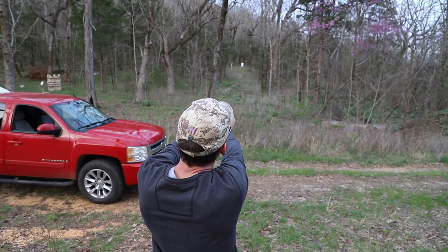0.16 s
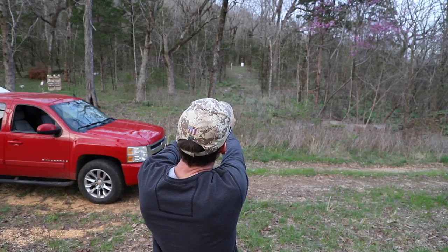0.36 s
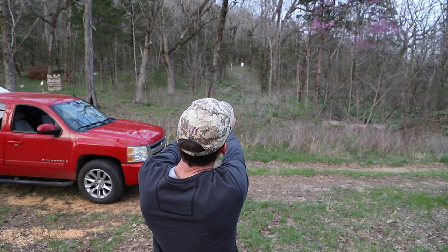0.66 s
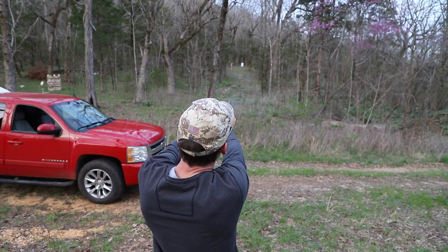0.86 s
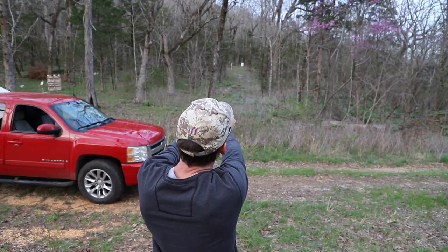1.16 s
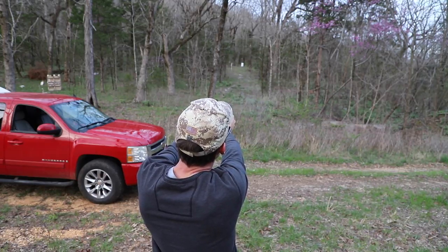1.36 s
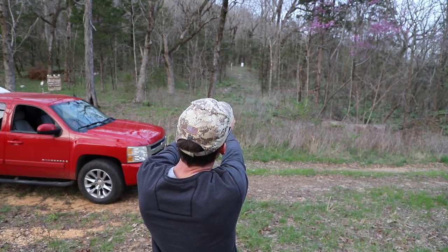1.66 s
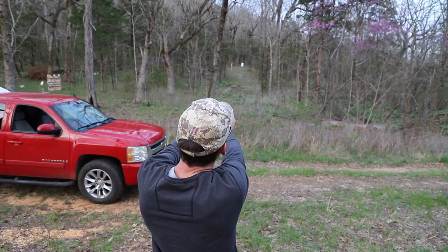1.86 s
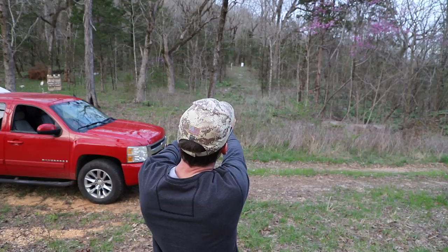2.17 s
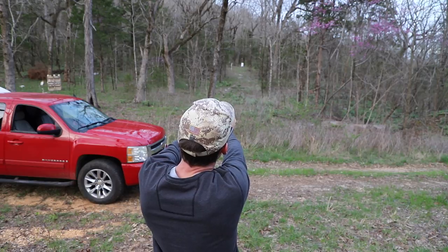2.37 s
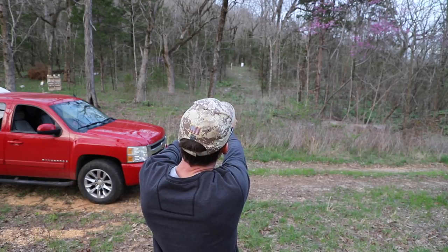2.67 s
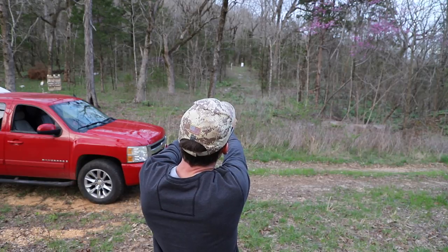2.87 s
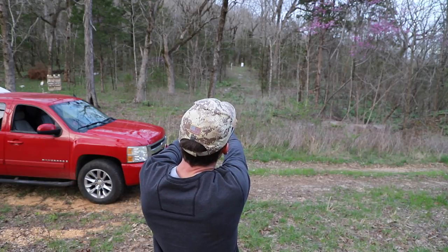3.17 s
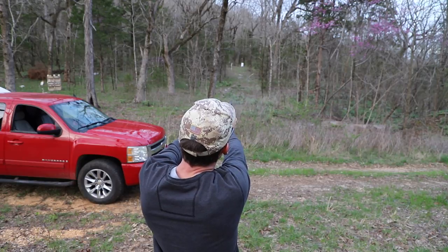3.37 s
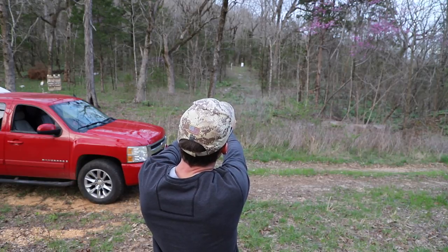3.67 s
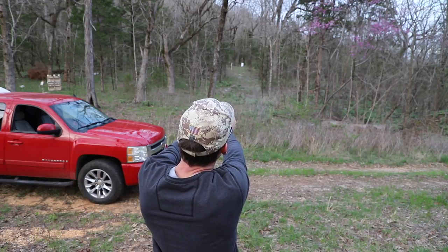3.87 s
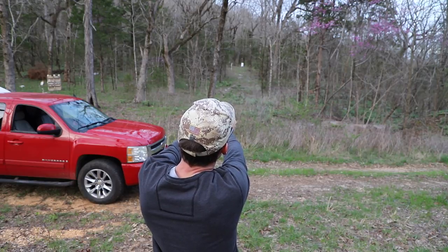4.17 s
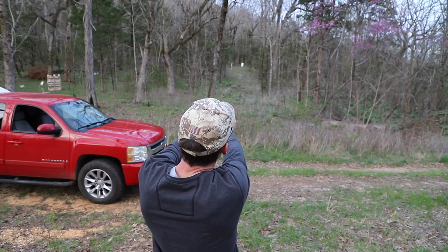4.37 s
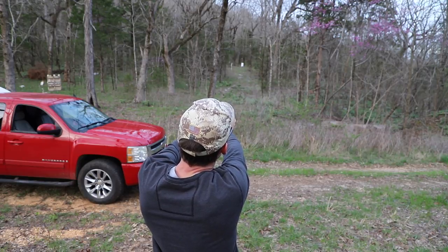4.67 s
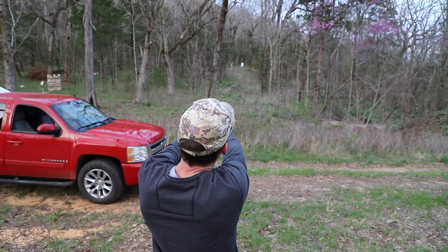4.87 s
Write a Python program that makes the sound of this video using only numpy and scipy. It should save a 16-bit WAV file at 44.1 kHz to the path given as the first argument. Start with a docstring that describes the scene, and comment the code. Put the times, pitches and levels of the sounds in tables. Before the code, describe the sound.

At a wood's edge, a silenced pistol fires twice, clipped and sharp; trees echo, a far target smacks, spent cases knock on metal.

```python
"""Edge of a wood: two suppressed pistol shots, shaped noise plus ringing modes, driven into hard clipping.
The slide cycles; trees return a swelling echo, banded noise whose treble dies first.
The bullet smacks a far target; the case hits a truck and the ground, modes and grainy noise bursts.
An earlier impact's echo fades at the start and a rough hum swells until the first shot.
Near-sine birds call far off over distant rumble and hiss, banded noise."""
import sys
import numpy as np
from scipy import signal
from scipy.io import wavfile

SR = 44100
rng = np.random.default_rng(int(sys.argv[2]) if len(sys.argv) > 2 else 0)


def master(y):
    """Save y as 16-bit WAV."""
    cut = np.clip(np.atleast_2d(y).T, -1, 1)
    pcm = np.round(cut * 32767)  # scale
    wavfile.write(sys.argv[1], SR, pcm.astype(np.int16))


N = 221690

# shots: start_s, blast_db (before clipping), slam_delay_s (blast to slide slam)
SHOTS = [(0.9327, 9.5, .0241), (3.3307, 9.5, .0229)]
# gas colour: freq_hz, relative_db_per_hz
GAS_SPECTRUM = [(59, -31.5), (150, -15.5), (500, -13.5), (902, -8), (1470, -12), (2830, -1), (5330, -8),
                (6590, 3), (7320, -11.5), (14100, -24.5), (15700, -30.5)]
# can's air column: freq_hz, level_db, t60_s
BORE_MODES = [(856, 10.5, 0.018), (1080, 5, 0.016)]
# low push as gas leaves the can: lag_s (after blast), freq_hz, level_db, t60_s
PUSH = [(.0021, 305, -5, .05), (.0052, 125, -9, .1)]
# action parts: lag_s (after blast), level_db
ACTION_HITS = [(-.0028, -23), (-.0016, -11.5)]
# slide slam: lag_s (after slam), level_db
SLAM_HITS = [(0, -13.5), (.0006, -12.5), (.009, -20.5)]
# steel of the action: freq_hz, level_db, t60_s
STEEL_MODES = [(1200, -6, 0.0049), (2500, -3, .002), (3400, -6, 0.0014), (6150, -2, .002),
               (8000, -6.5, 0.0016), (12000, -16.5, .0015)]
BLAST_HOLD_S, BLAST_T60_S = 0.0041, 0.015
VENT_DB, VENT_T60_S = -23.5, 0.15
BORE_LAG_S = 0.0008
PUSH_END_S, PUSH_END_T60_S = 0.0112, 0.012


def blast():
    """Turbulent gas gushes, then vents; the air column booms, a low push is cut off, steel clacks."""
    gas = sum(part for _, part in bands(rng.standard_normal((2, N)), GAS_SPECTRUM))
    gas_gain, push = np.zeros(N), np.zeros(N)
    hits = []
    for start_s, blast_db, slam_delay_s in SHOTS:
        age_s = since(start_s)
        gush = (age_s >= 0) * dying(np.maximum(age_s - BLAST_HOLD_S, 0), BLAST_T60_S)
        gas_gain += from_db(blast_db) * gush + from_db(VENT_DB) * dying(age_s, VENT_T60_S)

        # the can has emptied
        cutoff = dying(np.maximum(age_s - PUSH_END_S, 0), PUSH_END_T60_S)
        for lag_s, *mode in PUSH:
            push += strike([(start_s + lag_s, 0)], [mode]) * cutoff

        hits += [(start_s + lag_s, level_db) for lag_s, level_db in ACTION_HITS]
        hits += [(start_s + slam_delay_s + lag_s, level_db) for lag_s, level_db in SLAM_HITS]
    boom = strike([(start_s + BORE_LAG_S, 0) for start_s, *_ in SHOTS], BORE_MODES)
    clacks = strike(hits, STEEL_MODES, soft=True)
    return gas * gas_gain + boom + push + clacks


# scatter colour: freq_hz, relative_db_per_hz
WOOD_SPECTRUM = [(35, -52), (60, -13), (118, -5.5), (387, -8), (937, -15), (1330, -7), (3370, -4),
                 (4890, -9.5), (6040, -2), (15700, -21)]
# scatter decay: freq_hz, t60_s
WOOD_DECAY = [(100, 2.3), (500, 2.3), (2000, 1.85), (5000, 0.98), (9000, 0.68), (15000, 0.71)]
# silencer can resonances: freq_hz, width_hz, level_db
CAN_PEAKS = [(576, 310, -5.5), (1274, 110, -3.5), (1870.5, 47, -7.5), (2344, 56, -1), (3340, 300, -3.5),
             (4030, 110, 1.5), (4490, 220, -9), (5890, 220, 0), (6430, 280, -9.5), (7250, 130, -2),
             (8217, 140, -15), (9400, 110, -9)]
# trees' answer to each shot: level_db, tilt_db_per_octave (about 3 kHz)
ECHO_COLOUR = [(0.1, 0.33), (0.1, -0.1)]
CAN_DB = 9.5
TRUNKS_PER_S, TRUNK_DB = 65, -0.5


def wood_echo():
    """Scatter from many trees, treble dying first; single trunks stand out as slaps."""
    slaps = (rng.random(N) < TRUNKS_PER_S / SR) * rng.random(N)
    slaps = signal.lfilter([1], [1, -0.99], slaps) * from_db(TRUNK_DB)
    white = rng.standard_normal((2, N)) * (1 + slaps)
    coloured = white + from_db(CAN_DB) * resonate(white, CAN_PEAKS)
    shapes = [echo_shape(since(start_s)) for start_s, *_ in SHOTS]
    out = np.zeros(N)
    for hz, part in bands(coloured, WOOD_SPECTRUM):
        octaves = np.log2(hz / 3000)
        t60_s = at_hz(WOOD_DECAY, hz)
        for shape, (start_s, *_), (level_db, tilt_db) in zip(shapes, SHOTS, ECHO_COLOUR):
            gain = from_db(level_db + tilt_db * octaves)
            out += part * shape * gain * dying(since(start_s), t60_s)
    return out


# slaps from big trunks and banks: lag_s (after blast), level_db (added, re the scatter)
BIG_TRUNKS = [(0.088, 0), (.1, 1), (.133, -10), (0.141, 4.5), (.153, -6), (0.161, -1), (.178, -11),
              (0.197, 2), (0.211, -3), (0.243, 5.5)]
BIG_TRUNK_T60_S = 0.016
GROUND_DB, GROUND_START_S, GROUND_HOLD_S, GROUND_T60_S = -25.5, 0.015, 0.03, 0.054
CLEARING_DB = -33.5
TREES_S, TREES_DB = 0.084, -28.5
SWELL_S, SWELL_DB, DEPTH_DB_PER_DOUBLING = 0.066, 5.5, -2.5


def echo_shape(age_s):
    """Near ground answers first, then thin clearing scatter, then trees: swell, thinning with depth, slaps."""
    arrived = age_s >= GROUND_START_S
    ground = from_db(GROUND_DB) * arrived * dying(np.maximum(age_s - GROUND_HOLD_S, 0), GROUND_T60_S)
    inside_s = age_s - TREES_S
    clearing = from_db(CLEARING_DB) * arrived * (inside_s < 0)

    swell_db = SWELL_DB * np.clip(inside_s / SWELL_S, 0, 1)
    doublings = np.log2(np.maximum(age_s / (TREES_S + SWELL_S), 1))
    trees = (inside_s >= 0) * from_db(TREES_DB + swell_db + DEPTH_DB_PER_DOUBLING * doublings)
    slaps = sum(from_db(level_db) * dying(age_s - lag_s, BIG_TRUNK_T60_S) for lag_s, level_db in BIG_TRUNKS)
    trees = trees * (1 + slaps)
    return np.sqrt(ground ** 2 + clearing ** 2 + trees ** 2)


# bullet on target: start_s (negative: only its echo is heard), smack_db, bounce_db, echo_db,
# tilt_db_per_octave (echo, about 3 kHz)
IMPACTS = [(-.1, -67, -60, -47, 1.5), (1.514, -10, -17, -40.5, 4.5), (3.9137, -9.5, -25, -37.5, 0.6)]
# target: freq_hz, level_db, t60_s
TARGET_MODES = [(1830, -27, 0.013), (2560, -11, 0.0019), (3190, 2.5, 0.0022), (4330, -12, 0.0013),
                (5400, -17, .0013), (7250, -15, 0.0016), (9100, -27, 0.0048), (11600, -35, 0.0033)]
# far trees' colour: freq_hz, relative_db_per_hz
FAR_WOOD_SPECTRUM = [(240, -39), (400, -8), (444, -1), (547, -8.5), (770, -5.5), (1370, -0.5), (1820, -4.5),
                     (3510, -1.5), (4320, -11), (6860, -20), (14000, -42.5)]
# far trees' decay: freq_hz, t60_s
FAR_WOOD_DECAY = [(500, 1.6), (3000, 1.3), (6000, 1.1), (12000, 0.32)]
TARGET_BOUNCE_S, FAR_ECHO_LAG_S = 0.0017, 0.0015


def impacts():
    """The target's modes ring as a dry smack, again by ground bounce; far trees answer as decaying noise."""
    hits = []
    for start_s, smack_db, bounce_db, *_ in IMPACTS:
        hits += [(start_s, smack_db), (start_s + TARGET_BOUNCE_S, bounce_db)]
    out = strike(hits, TARGET_MODES, soft=True)
    for hz, part in bands(rng.standard_normal((2, N)), FAR_WOOD_SPECTRUM):
        octaves = np.log2(hz / 3000)
        t60_s = at_hz(FAR_WOOD_DECAY, hz)
        for start_s, _, _, echo_db, tilt_db in IMPACTS:
            gain = from_db(echo_db + tilt_db * octaves)
            out += part * gain * dying(since(start_s + FAR_ECHO_LAG_S), t60_s)
    return out


# case on sheet metal, rim then mouth: start_s (mouth), mouth_db, rebound_db, ring_db, skitter_db
LANDINGS = [(1.259, -13.5, -38, -48, -39), (4.2928, -15, -30, -46.5, -38.5)]
# truck panel: freq_hz, level_db, t60_s
PANEL_MODES = [(1220, -6.5, 0.005), (1760, -13, 0.0049), (3160, -5, 0.0045), (4230, -12, 0.0058),
               (5260, -11.5, 0.0019), (6940, -9.5, 0.0028), (8260, -15, 0.0031), (11700, -14, 0.0004)]
# brass case: freq_hz, level_db, t60_s
BRASS_MODES = [(7040, 0, 0.19), (7150, 1, .1), (7180, -1, .07)]
RIM_LEAD_S, RIM_DB, REBOUND_S = 0.0008, -4, 0.0068  # RIM_DB re mouth
SKITTER_LOW_HZ, SKITTER_HIGH_HZ, SKITTER_T60_S = 1300, 8000, 0.079


def case():
    """The spent case excites the truck's panel modes, rings faintly and skitters off as grainy noise."""
    knocks, rings, skitters = [], [], []
    for start_s, mouth_db, rebound_db, ring_db, skitter_db in LANDINGS:
        rebound_s = start_s + REBOUND_S
        knocks += [(start_s - RIM_LEAD_S, mouth_db + RIM_DB), (start_s, mouth_db), (rebound_s, rebound_db)]
        rings.append((start_s, ring_db))
        skitters.append((rebound_s, skitter_db, SKITTER_LOW_HZ, SKITTER_HIGH_HZ, SKITTER_T60_S))
    panel = strike(knocks, PANEL_MODES, soft=True)
    return panel + strike(rings, BRASS_MODES) + bursts(skitters)


# dry ticks on the ground: start_s, level_db, low_hz, high_hz
TICKS = [(.063, -31, 2420, 5100), (.107, -50, 2500, 6800), (0.18, -52, 2500, 6000),
         (0.21, -52.5, 2480, 6000), (1.388, -38.5, 2810, 4200), (1.436, -42, 3340, 4900),
         (1.745, -35.5, 1470, 4500), (1.835, -41, 1200, 4800), (1.857, -45, 700, 4000),
         (1.926, -44, 2400, 6600), (2.17, -54, 2500, 4500), (2.273, -47, 1200, 3600),
         (2.759, -47.5, 2900, 4150), (2.84, -58, 3230, 4070), (2.937, -56, 3100, 4400),
         (2.952, -58, 3000, 3900), (3.04, -55, 2200, 3400), (3.053, -50, 3000, 4200),
         (3.786, -44, 2900, 4000), (4.065, -31.5, 2200, 5500), (4.408, -41, 1200, 4900),
         (4.76, -53, 3500, 4600)]
# longer grainy noise bursts, the first a bright spray just after the bullet's smack:
# start_s, level_db, low_hz, high_hz, t60_s
LONG_BURSTS = [(1.517, -33, 2360, 5160, 0.2), (1.725, -48, 1190, 15000, 0.17),
               (1.733, -40, 1410, 4870, 0.098), (4.073, -30.5, 2350, 4140, 0.065),
               (4.137, -56, 6000, 15500, 0.26)]
TICK_T60_S = 0.017


def ticks():
    """Band-limited grainy noise: ticks share one short decay, the long bursts last longer."""
    return bursts([(*tick, TICK_T60_S) for tick in TICKS] + LONG_BURSTS)


# a dove three times, two thin whistles: start_s, length_s, first_hz, last_hz, level_db
BIRDS = [(2.52, .37, 513, 515, -58), (3.68, .33, 512, 507, -57), (4.55, .47, 505, 503, -59),
         (2.445, .05, 1460, 1485, -65), (4.77, .2, 1820, 2100, -74)]
CALL_ATTACK, CALL_RELEASE = 0.17, 0.17  # shares of the length
CALL_FADE_DB, CALL_EDGE_DB = -5.5, -10.5  # at release start; at both ends


def birds():
    """Soft near-sine calls, slightly unsteady: each rises, fades and stops while its pitch glides."""
    out = np.zeros(N)
    lowpass = signal.butter(2, 15, fs=SR, output="sos")
    waver_db = 2.0 * rms_one(signal.sosfilt(lowpass, rng.standard_normal(N)))
    corners = [0, CALL_ATTACK, 1 - CALL_RELEASE, 1]
    corner_db = [CALL_EDGE_DB, 0, CALL_FADE_DB, CALL_EDGE_DB]
    for start_s, length_s, first_hz, last_hz, level_db in BIRDS:
        progress = since(start_s) / length_s
        shape_db = np.interp(progress, corners, corner_db, left=-200, right=-200)
        hz = first_hz + (last_hz - first_hz) * np.sin(np.pi / 2 * np.clip(progress, 0, 1))
        tone = np.sqrt(2) * np.sin(2 * np.pi * np.cumsum(hz) / SR)
        out += from_db(level_db + shape_db + waver_db) * tone
    return out


# hum resonances: freq_hz, width_hz, level_db
HUM_PEAKS = [(535, 35, 4), (466, 84, -3), (770, 200, -10.5), (910, 140, -11.5)]
HUM_DB, HUM_BEFORE_DB = -55.5, -10  # HUM_BEFORE_DB re HUM_DB
HUM_START_S, HUM_RISE_S, HUM_END_S, HUM_T60_S = 0.52, 0.16, 0.93, 0.5


def hum():
    """Noise through low resonances: swells, holds until the first shot, then dies away."""
    rough = rms_one(resonate(rng.standard_normal(N), HUM_PEAKS))
    swell_db = HUM_BEFORE_DB * np.clip(1 - since(HUM_START_S) / HUM_RISE_S, 0, 1)
    fade = dying(np.maximum(since(HUM_END_S), 0), HUM_T60_S)
    return from_db(HUM_DB + swell_db) * fade * rough


# background colour: freq_hz, relative_db_per_hz
AIR_SPECTRUM = [(15, -38), (25, -5.5), (82, 4.5), (360, -2.5), (401, 2.5), (459, -3.5), (498, -5.5),
                (618, -9), (787, -5.5), (1060, -14), (1720, -20), (3370, -20), (4300, -23.5), (13700, -27),
                (15700, -23.5)]
AIR_DB = -56


def air():
    """Distant rumble and hiss: banded noise whose level drifts most in the bass."""
    out = np.zeros(N)
    for hz, part in bands(rng.standard_normal((2, N)), AIR_SPECTRUM):
        drift = np.interp(np.arange(N), np.linspace(0, N, 16), rng.standard_normal(16))
        out += part * from_db(drift * 2.0 / (1 + hz / 1500))
    return from_db(AIR_DB) * out


def strike(hits, modes, soft=False):
    """Clicks (start_s, level_db) ring modes (freq_hz, level_db, t60_s), levels varied; soft ones build up."""
    hits = np.array([hit for hit in hits if hit[0] >= 0])
    luck_db = 1.5 * rng.normal(0, 1, (len(hits), len(modes)))
    at = (hits[:, 0] * SR).astype(int)
    out = np.zeros(N)
    for k, (hz, level_db, t60_s) in enumerate(modes):
        x = np.full(N, 1e-18)
        x[at] = from_db(hits[:, 1] + level_db + luck_db[:, k])
        r, w = from_db(-60 / (t60_s * SR)), 2 * np.pi * hz / SR
        poles = [1, -2 * r * np.cos(w), r * r]
        x = signal.lfilter([0, np.sin(w)], poles, x)
        if soft:  # second pass rounds the attack, narrows the band
            x = signal.lfilter((-1) ** k * np.e * (1 - r) * np.array([1, 0, -1]), poles, x)
        out += x
    return out


def resonate(x, peaks):
    """Parallel resonances (freq_hz, width_hz, level_db), signs alternating."""
    out = 0
    for k, (hz, width_hz, level_db) in enumerate(peaks):
        r = np.exp(-np.pi * width_hz / SR)
        zeros = (1 - r * r) / 2 * np.array([1, 0, -1])
        poles = [1, -2 * r * np.cos(2 * np.pi * hz / SR), r * r]
        out = out + (-1) ** k * from_db(level_db) * signal.lfilter(zeros, poles, x)
    return out


def bursts(rows):
    """Short grainy noise bursts (start_s, level_db, low_hz, high_hz, t60_s)."""
    out, size = np.zeros(N), SR // 8
    for start_s, level_db, low_hz, high_hz, t60_s in rows:
        sos = signal.butter(3, [low_hz, high_hz], "band", fs=SR, output="sos")
        grains = rms_one(rng.standard_normal(size) * rng.exponential(1, size) ** 0.5)
        burst = signal.sosfilt(sos, grains * dying(np.arange(size) / SR, t60_s))
        burst *= np.sqrt(SR / 2 / (high_hz - low_hz))  # offsets power lost to the band
        at = int(start_s * SR)
        out[at:at + size] += from_db(level_db) * burst
    return out


# third-octave band edges: freq_hz
EDGES_HZ = 25 * 2 ** np.arange(0, 9.5, 1 / 3)


def bands(white, spectrum):
    """Third-octave bands (centre_hz, signal), rms 1 together; neighbours use unrelated noise."""
    out = []
    for k, (low_hz, high_hz) in enumerate(zip(EDGES_HZ, EDGES_HZ[1:])):
        hz = np.sqrt(low_hz * high_hz)
        sos = signal.butter(2, [low_hz, high_hz], "band", fs=SR, output="sos")
        out.append((hz, from_db(at_hz(spectrum, hz)) * signal.sosfilt(sos, white[k % 2])))
    total = np.std(sum(part for _, part in out))
    return [(hz, part / total) for hz, part in out]


def from_db(db):
    """Decibels to gain."""
    return 10 ** (np.asarray(db) / 20)


def rms_one(x):
    """Scaled to rms 1."""
    return x / np.sqrt(np.mean(x ** 2) + 1e-20)


def at_hz(points, hz):
    """A frequency table read on a log axis."""
    points = np.array(points)
    return np.interp(np.log(hz), np.log(points[:, 0]), points[:, 1])


def since(start_s):
    """Seconds elapsed after start_s."""
    return np.arange(N) / SR - start_s


def dying(age_s, t60_s):
    """Silent before age 0, then 60 dB down each t60."""
    return (age_s >= 0) * from_db(-60 * np.maximum(age_s, 0) / t60_s)


def scene():
    """All sources at one microphone."""
    return (blast() + wood_echo() + impacts() + case() + ticks() + birds() + hum() + air())[None]


CLIP_LEVEL, CUTOFF_HZ = 0.86, 16100


def record(dry):
    """The converter clips hard; a steep low-pass cuts the top."""
    clipped = np.clip(dry, -CLIP_LEVEL, CLIP_LEVEL)
    lowpass = signal.cheby2(20, 50, CUTOFF_HZ, fs=SR, output="sos")
    return np.clip(signal.sosfilt(lowpass, clipped), -1, 1)


dry = scene()
out = record(dry)
master(out)
```